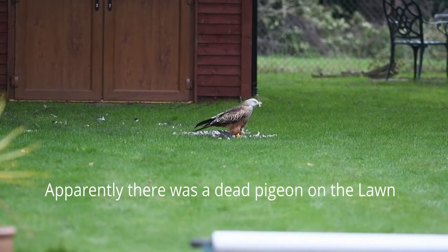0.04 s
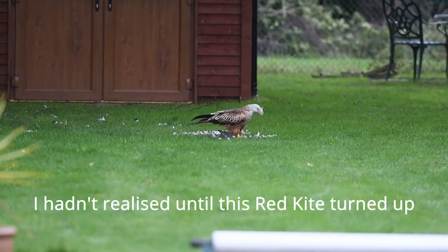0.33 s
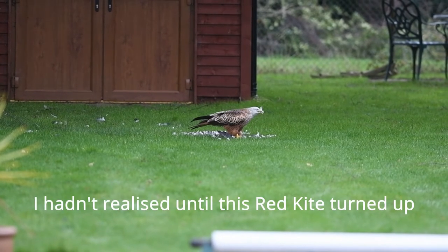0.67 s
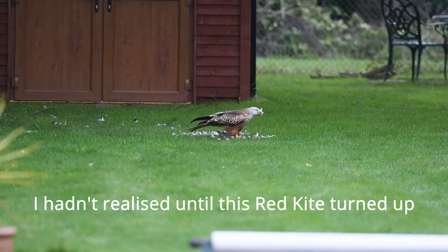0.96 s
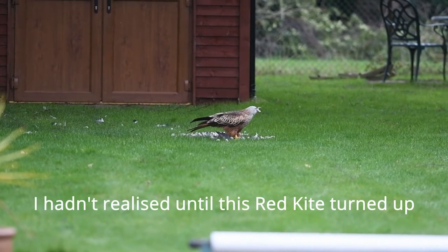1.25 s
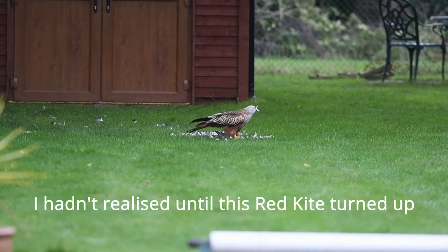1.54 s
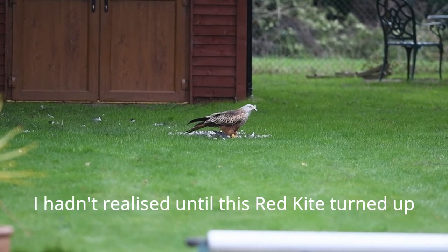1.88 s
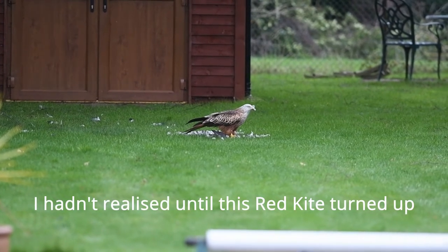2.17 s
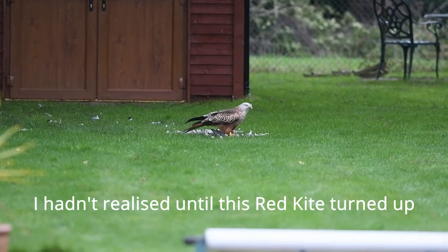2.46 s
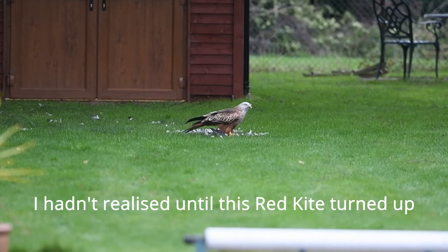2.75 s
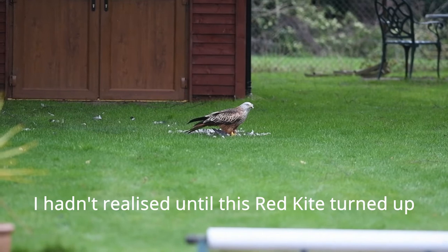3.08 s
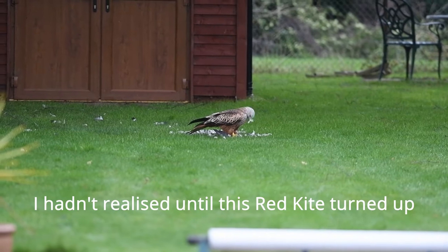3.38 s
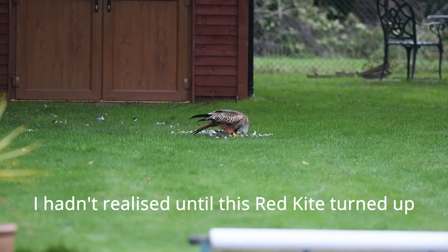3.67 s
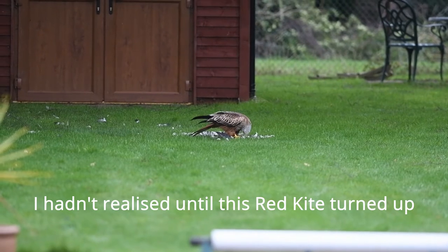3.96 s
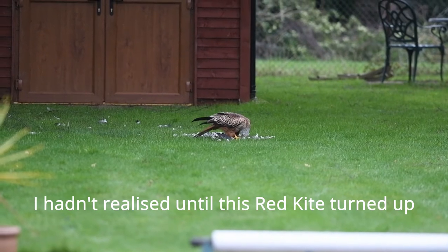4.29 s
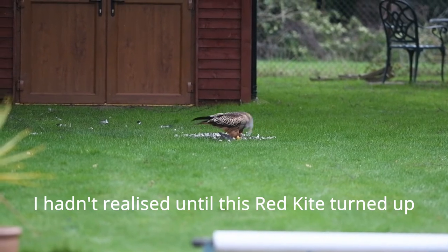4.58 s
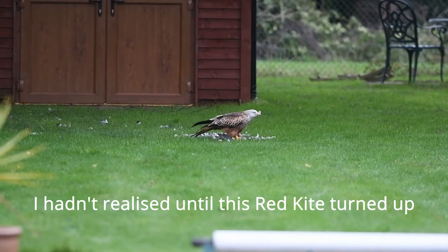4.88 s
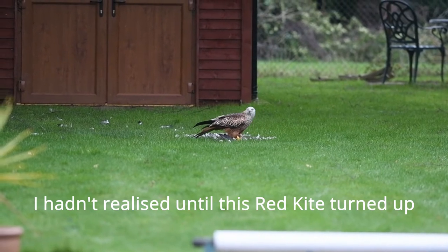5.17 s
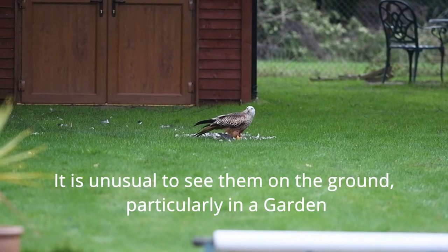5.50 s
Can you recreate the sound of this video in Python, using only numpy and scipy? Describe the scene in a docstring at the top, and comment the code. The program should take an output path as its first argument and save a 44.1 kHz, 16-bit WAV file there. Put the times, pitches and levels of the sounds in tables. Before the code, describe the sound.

A quiet garden with a steady murmur of distant traffic and a faint hiss. At the start a far hum swells and fades, a bird gives one faint call, and dry leaves tick around 0.5 seconds; light ticks and rustles recur until about 3.5 seconds. From 1 second a finch sings one song, thin high notes falling into quick lower runs and ending in a flourish at about 3.7 seconds. Between 1.5 and 2.5 seconds a blackbird whistles a short, lower phrase. Both birds sit slightly left, with a soft echo. Faint lone calls follow near 3.9 and 4.3 seconds. Wind buffets the right side of the microphone with a dull, low thudding, lightly between 1 and 2 seconds, then harder from 3.7 seconds to the end. The strongest gust, around 5 seconds, is the loudest sound.

```python
"""A chaffinch sings one falling song with a final flourish, between lone calls, in a quiet garden,
while a blackbird whistles a short phrase. Each note is a near sine, frequency-modulated by the syrinx
and heard through the scattering of trees and walls. Dry leaves tick and rustle nearby, distant traffic
murmurs under a faint hiss, a far hum swells and fades, and turbulent gusts buffet the right port
of the microphone."""
import sys
import numpy as np
from scipy import signal
from scipy.fft import rfft, irfft
from scipy.io import wavfile
from scipy.ndimage import uniform_filter1d

SR = 44100
rng = np.random.default_rng(int(sys.argv[2]) if len(sys.argv) > 2 else 0)


def wav_out(sig):
    """Save sig, one row per channel (or a flat mono array), as 16-bit PCM at SR to the path in sys.argv[1]."""
    wavfile.write(sys.argv[1], SR, np.round(np.clip(np.atleast_2d(sig).T, -1, 1) * 32767).astype(np.int16))


N = 243873
TIME = np.arange(N) / SR


def undb(db):
    """Amplitude ratio: tenfold for every 20 dB."""
    return 10 ** (np.asarray(db) / 20)


def unit(x):
    """Normalisation to rms 1."""
    return x / np.sqrt(np.mean(x ** 2))


def pan(db):
    """Direction by level difference: channel gains with the left `db` above the right."""
    return undb(np.array([[db], [-db]]) / 2)


def shaped(x, gain):
    """Zero-phase filtering: the spectrum is multiplied by a gain that depends on frequency."""
    hz = np.maximum(np.fft.rfftfreq(x.shape[-1], 1 / SR), 1)
    return irfft(rfft(x) * gain(hz), x.shape[-1])


def band(x, hz, width_hz):
    """A second-order resonance applied twice, for steep skirts."""
    return shaped(x, lambda f: 1 / (1 + ((f * f - hz * hz) / (f * width_hz)) ** 2))


def coloured(points):
    """Spectral shaping of uncorrelated left and right noise, at rms 1."""
    hz, db = np.transpose(points)
    white = rng.standard_normal((2, N))
    return unit(shaped(white, lambda f: undb(np.interp(np.log(f), np.log(hz), db))))


def walk(rate):
    """Random modulation: `rate` values a second, joined smoothly, with a spread near 1."""
    hold = max(int(SR / rate), 1)
    steps = np.repeat(rng.standard_normal(N // hold + 1), hold)
    return unit(uniform_filter1d(steps, hold))[:N]


def traffic_and_hiss():
    """Broadband noise, slightly amplitude-modulated: far traffic murmurs under a smooth hiss."""
    # Each row of both spectra: frequency in Hz, relative spectral density in dB.
    traffic_spectrum = [(15, -46), (25, -2.5), (54, -10), (97, 4), (135, -6.5), (241, -6), (370, -13),
                        (395, -12), (444, -14), (950, -17.5), (1300, -24.5), (1690, -48), (2860, -120)]
    hiss_spectrum = [(300, -32), (1300, 3), (2300, 0), (3800, -2), (5500, -5), (9000, -8), (15500, -12)]
    murmur = coloured(traffic_spectrum) * undb(-57.5 + 0.79 * walk(2.87))
    hiss = coloured(hiss_spectrum) * undb(-70 + 0.82 * walk(13))
    return pan(5.9) * murmur + pan(3.9) * hiss


def hum():
    """Narrow-band noise is heard as a pitch: a faint far-off hum drifts in and fades."""
    swell = np.exp(-((TIME - .35) / 0.31) ** 2)
    drone = unit(band(rng.standard_normal((2, N)), hz=397.0, width_hz=9.9))
    return pan(5) * undb(-70) * swell * drone


def gusts():
    """Wind strength in dB: gusts rise, hold and decay, adding in power to a breeze; the sum flutters."""
    # Each row: start in seconds, length in seconds, level in dB.
    gust_events = [(1.008, 0.31, -46.5), (1.408, 0.065, -43.5), (1.739, 0.095, -51.5), (3.749, 0.29, -35),
                   (4.215, 0.16, -37.5), (4.557, 0.3, -43), (4.85, 0.33, -27), (5.319, 0.19, -35.5)]
    attack_s, release_s = 0.03, 0.07
    breeze_db, flutter_db = -66, 2.0
    power = undb(breeze_db) ** 2
    for start, length, db in gust_events:
        attack = np.exp(np.minimum(TIME - start, 0) / attack_s)
        release = np.exp(-np.maximum(TIME - start - length, 0) / release_s)
        power = power + (undb(db) * attack * release) ** 2
    return 10 * np.log10(power) + flutter_db * walk(16)


def wind():
    """Turbulent pressure at the right port: stronger gusts hold smaller, faster eddies."""
    # Single eddies that hit the port. Each row: centre in seconds, level in dB, width in seconds.
    eddies = [(1.427, -35, 0.0039), (1.63, -29.5, 0.0028), (4.911, -17, 0.0014), (4.922, -19.5, 0.0074)]
    shelter_db = -31.5  # the sheltered left port against the right
    gust_db = gusts()
    slow = unit(band(rng.standard_normal((2, N)), hz=46.4, width_hz=46.5))
    # Evened out, the big eddies follow the strength of the gust closely.
    slow = unit(slow / np.sqrt(uniform_filter1d(slow ** 2, size=2400) + 0.073))
    fast = unit(band(rng.standard_normal((2, N)), hz=102, width_hz=30))
    pressure = undb(gust_db) * (slow + fast * undb(-6 + 0.26 * gust_db))
    for centre, db, width in eddies:
        u = (TIME - centre) / width
        pressure = pressure - undb(db) * u * np.exp((1 - u * u) / 2)  # a push, then suction
    port = signal.butter(4, 190, fs=SR, output="sos")  # only a dull thudding gets through
    return signal.sosfilt(port, pressure) * undb(np.array([[shelter_db], [0]]))


def leaves():
    """Damped resonance: dry twigs and leaves tick and ring briefly; many tiny cracks merge into rustles."""
    # Each row: start in seconds, relative level in dB, resonance in Hz, bandwidth in Hz, T60 in seconds.
    tick_events = [(.355, -57.5, 4200, 3010, .018), (0.363, -59.5, 5960, 5030, 0.017),
                   (.399, -68, 6000, 8000, 0.036), (.519, -65, 6300, 2000, .02),
                   (.567, -53, 4270, 1100, 0.012), (.604, -55.5, 4070, 1800, .016),
                   (.604, -54.5, 2030, 900, 0.025), (1.342, -60.5, 6700, 3000, 0.075),
                   (1.349, -57, 8250, 1400, .055), (1.436, -62, 6300, 4000, 0.054),
                   (2.364, -61.5, 7500, 7940, 0.11), (3.049, -61, 6940, 7000, .045),
                   (3.074, -71, 9000, 10040, .1)]
    # Each row: centre in seconds, half length in seconds, level in dB.
    rustles = [(.41, .04, -74), (0.695, 0.022, -68), (.95, 0.4, -79.5), (1.444, 0.17, -71),
               (2.054, 0.51, -74.5), (2.617, 0.04, -69.5), (2.785, 0.12, -67.5), (3.111, 0.044, -65.5),
               (3.397, .4, -75.5)]
    ticks = np.zeros((2, N))
    t = TIME[:4096]
    for s, db, hz, width, t60 in tick_events:
        start = int(s * SR)
        ring = unit(band(rng.standard_normal((2, len(t))), hz, width))
        attack = 1 - np.exp(-t / (0.026 * t60))
        ticks[:, start:start + len(t)] += ring * undb(db + 2.5 - 60 * t / t60) * attack
    power = sum(undb(db) ** 2 * np.exp(-((TIME - s) / half) ** 2) for s, half, db in rustles)
    cracks = rng.standard_normal((2, N)) * undb(2.24 * walk(400) + 2 * walk(35))
    rustle = np.sqrt(power) * unit(band(cracks, hz=6300, width_hz=9300))
    return pan(1.8) * (ticks + rustle)


def note(rows, buzz_hz, waver):
    """Frequency modulation: a fast flutter of the syrinx swings a sine about its pitch path."""
    s, hz, db, buzz = np.transpose(rows)
    span = np.flatnonzero((TIME >= s[0]) & (TIME < s[-1]))
    t = TIME[span]
    flutter = np.sin(2 * np.pi * buzz_hz * t + waver[span])
    pitch = np.interp(t, s, hz) * (1 + np.interp(t, s, buzz) * flutter)
    edges = np.clip(np.minimum(t - s[0], s[-1] - t) / .004, 0, 1)
    amplitude = np.sqrt(2) * edges * undb(np.interp(t, s, db))
    out = np.zeros(N)
    out[span] = amplitude * np.sin(2 * np.pi * np.cumsum(pitch) / SR)
    return out


def garden(x, rise_s, near_t60, far_db, far_t60):
    """Multiple scattering: a hidden bird is heard only by echoes from foliage and far walls and trees."""
    t = TIME[:SR]
    build_up = 1 - np.exp(-t / rise_s)
    decay = undb(-60 * t / near_t60) + undb(far_db - 60 * t / far_t60)
    spectrum = rfft(rng.standard_normal((2, SR)) * build_up * decay)
    # The many paths favour no broad band of pitch over another.
    echoes = irfft(spectrum / np.sqrt(uniform_filter1d(abs(spectrum) ** 2, size=120)))
    scattered = signal.fftconvolve(x[None], echoes[:, :SR * 3 // 4], axes=1)
    arrival = int(rise_s * SR / 2)  # note times count from when the echoes swell
    return scattered[:, arrival:arrival + N]


def blackbird():
    """A rasp, a burred falling note, a low whistle and a louder high one, with a far wall's reflection."""
    # One list a note. Each row: time in seconds, pitch in Hz, level in dB, buzz as a share of the pitch.
    whistles = [
        [(1.5, 2113, -68, 0.19), (1.53, 2145, -62, 0.14), (1.58, 2050, -63.5, 0.23), (1.605, 1784, -72, 0.2),
         (1.624, 2550, -59, 0.1)],
        [(1.725, 2383, -63, 0.02), (1.76, 2280, -62, 0.01), (1.795, 2210, -58.5, 0.06),
         (1.885, 2170, -59, 0.07), (1.96, 2106, -54.5, 0.1), (2.005, 1960, -71, 0)],
        [(2.01, 1860, -64.5, 0.03), (2.06, 1741, -61, 0), (2.135, 1687, -59.5, 0.03), (2.21, 1763, -58, 0.01)],
        [(2.333, 2450, -60.5, 0.06), (2.39, 2376, -49, 0.01), (2.425, 2321, -53.5, 0.04), (2.455, 2350, -51, 0)],
    ]
    echo_s, echo_db = 0.33, -21.5
    waver = 0.73 * walk(70)  # phase drift of the buzz, in radians
    phrase = sum(note(rows, buzz_hz=98, waver=waver) for rows in whistles)
    reflection = undb(echo_db) * np.pad(phrase, (int(echo_s * SR), 0))[:N]
    return pan(5.0) * garden(phrase + reflection, rise_s=0.00501, near_t60=0.21, far_db=-23, far_t60=1.58)


def syllables():
    """Periodic repetition: each chaffinch run keeps an even beat as it settles in level and pitch."""
    # Calls before and after the song. Each row: start in seconds, level in dB, pitch factor.
    lone_calls = [(.2, -73, .98), (3.909, -76.5, 1.03), (4.34, -70.5, .98)]
    # Each row: start in seconds, shape, repeats, period in seconds, settled level in dB, settled
    # pitch factor, the first syllable's shortfall in dB and its excess in pitch factor.
    runs = [(.988, "see", 5, .128, -62.5, 0.99, 18, -0.012), (1.647, "chip", 5, 0.13, -53.5, 0.98, 5, .025),
            (1.735, "slur", 4, .1305, -58.5, .925, 3.5, 0), (2.258, "chew", 6, .1085, -55, 0.95, 2, .11),
            (2.944, "twee", 3, .1355, -58, 0.98, -3.5, -.02), (3.371, "tsip", 2, 0.074, -58, .92, 2, -.03),
            (3.535, "flourish", 1, 0, -54.5, 0.98, 0, 0.0024)]
    sung = [(start, "call", db, factor) for start, db, factor in lone_calls]
    for start, shape, repeats, period, db, factor, softer_db, sharper in runs:
        for k, unsettled in enumerate(np.linspace(1, 0, repeats) ** 2):
            sung.append((start + k * period, shape, db - softer_db * unsettled,
                         factor + sharper * unsettled))
    return sung


def chaffinch():
    """Fast frequency sweeps of the syrinx: lone calls, and runs of syllables that end in a flourish."""
    # One list a syllable shape. Each row: time from its start in seconds, nominal pitch in Hz,
    # relative level in dB, buzz as a share of the pitch.
    shapes = { "see": [(0, 4910, -4, 0.04), (.018, 5090, 0.5, 0.05), (.042, 5030, -4, .006)],
              "slur": [(0, 7550, -4, .04), (.022, 6300, -9.5, 0.12), (.036, 5340, -1, 0.08),
              (.058, 4780, -4, 0)], "chip": [(0, 3780, -7, 0.02), (.011, 3974, -0.5, 0.08),
              (.022, 3680, 2.5, .07), (.036, 3532, -13, 0.12)], "chew": [(0, 2936, 2.5, 0.19),
              (.018, 4630, -2, 0.2), (.036, 3700, -2, 0.18), (.048, 3329, 2, 0.07),
              (.076, 2756, -5.5, 0.17)], "twee": [(0, 5100, -6, 0.12), (.02, 3500, -5.5, 0.3),
              (.04, 2650, -8, 0.18), (.062, 2430, -3.5, 0.14), (.082, 2930, -1, 0.11), (.1, 3550, 8, 0.07),
              (.112, 3420, -14, 0.1), (.128, 2830, 6.5, 0.2)], "tsip": [(0, 7860, 3.5, .06),
              (.016, 6720, -4, 0.12), (.038, 5700, 0.5, 0.15)], "flourish": [(0, 3650, -8, 0.06),
              (.035, 3920, -3, 0.15), (.09, 4330, -2.5, 0.13), (.125, 4120, -2.5, 0.23),
              (.16, 3100, -11.5, 0.19), (.23, 2360, -11.5, 0.14)], "call": [(0, 4040, 0, .14),
              (.03, 3730, 1.5, 0.1), (.09, 3100, -1.5, 0.23)], }
    waver = 1.114 * walk(200)  # phase drift of the buzz, in radians
    song = np.zeros(N)
    for start, shape, db, factor in syllables():
        rows = [(start + s, hz * factor, db + shade, buzz) for s, hz, shade, buzz in shapes[shape]]
        song += note(rows, buzz_hz=171.5, waver=waver)
    return pan(3.6) * garden(song, rise_s=.012, near_t60=0.16, far_db=-17, far_t60=0.82)


def scene():
    """Superposition of both birds, the leaves, the wind and the distant background."""
    return chaffinch() + blackbird() + leaves() + wind() + traffic_and_hiss() + hum()


def record(dry):
    """Band limiting: the camera's steep low-pass filter cuts the highest treble."""
    top_hz = 15750
    return signal.sosfilt(signal.ellip(10, .2, 80, top_hz, fs=SR, output="sos"), dry)


dry = scene()
out = record(dry)
wav_out(out)
```